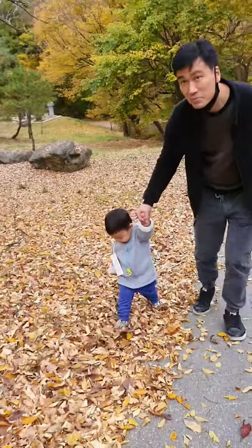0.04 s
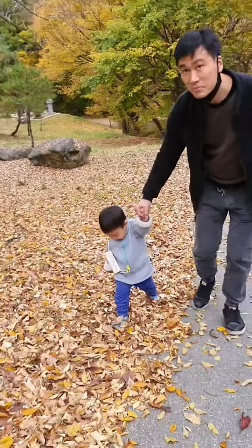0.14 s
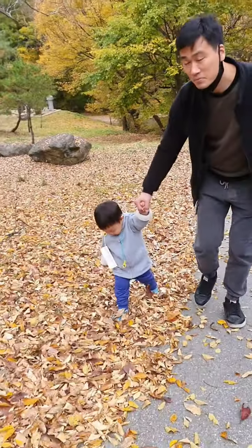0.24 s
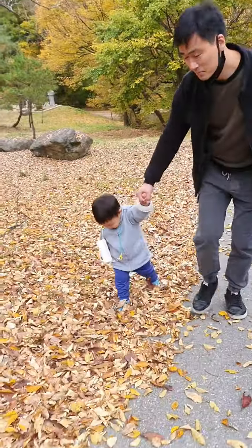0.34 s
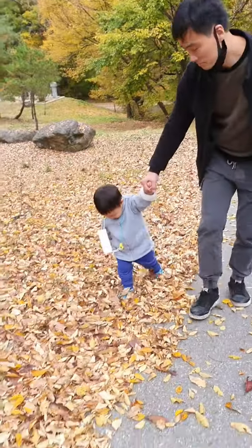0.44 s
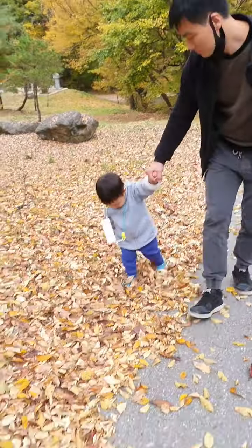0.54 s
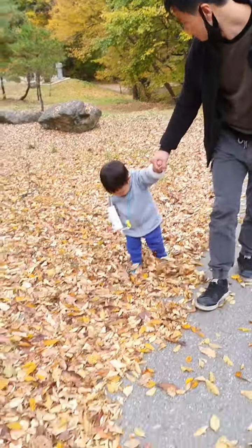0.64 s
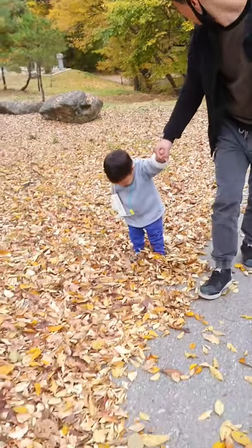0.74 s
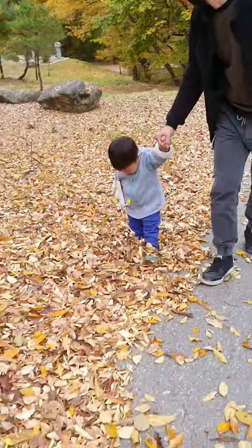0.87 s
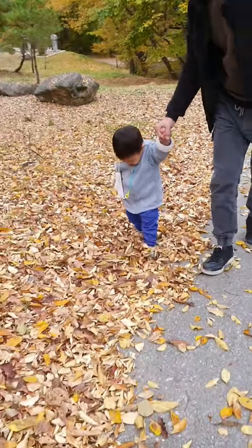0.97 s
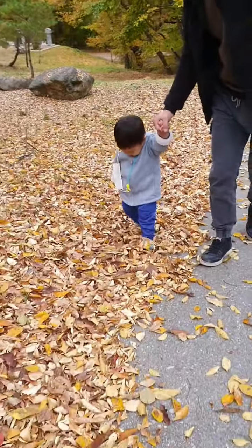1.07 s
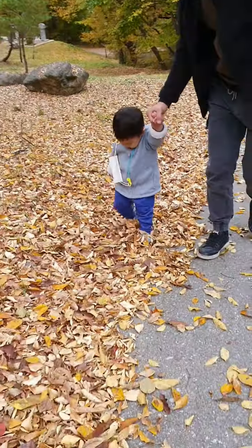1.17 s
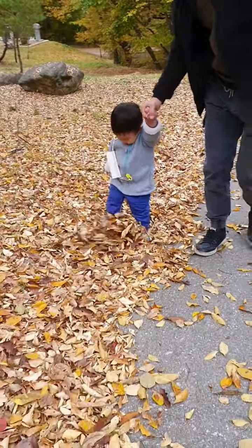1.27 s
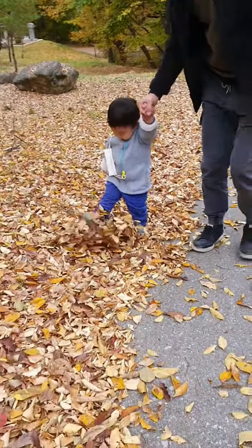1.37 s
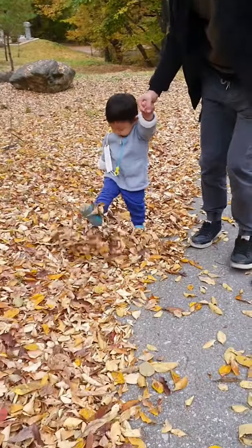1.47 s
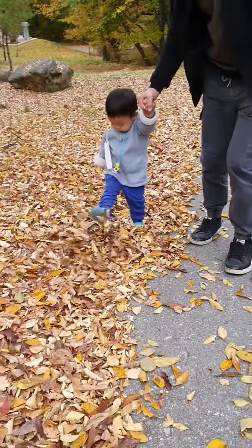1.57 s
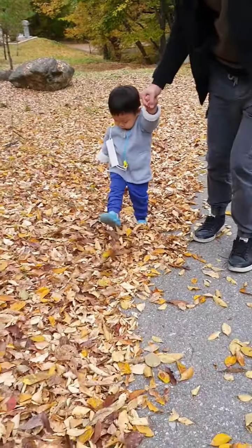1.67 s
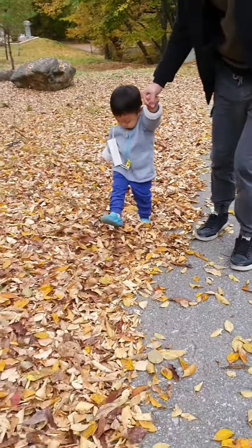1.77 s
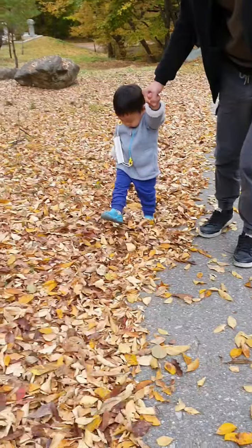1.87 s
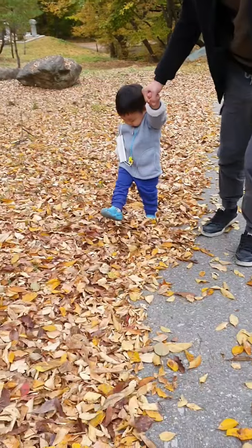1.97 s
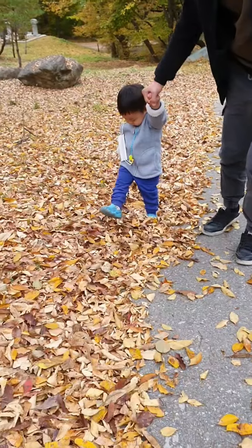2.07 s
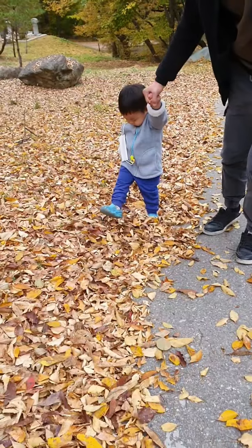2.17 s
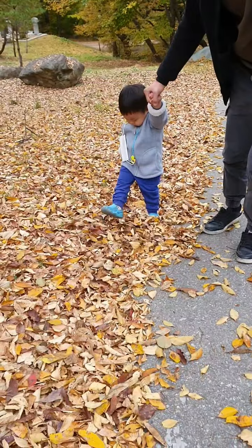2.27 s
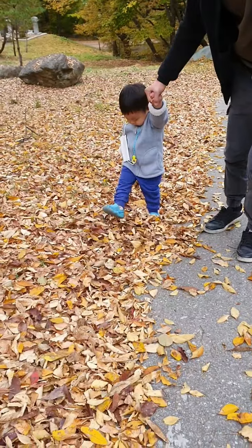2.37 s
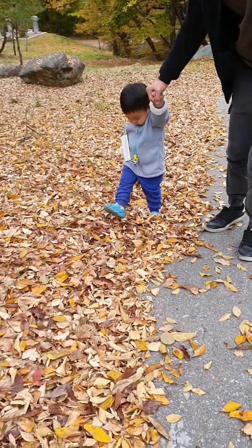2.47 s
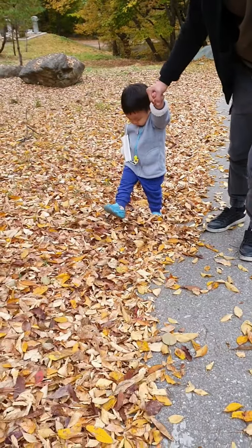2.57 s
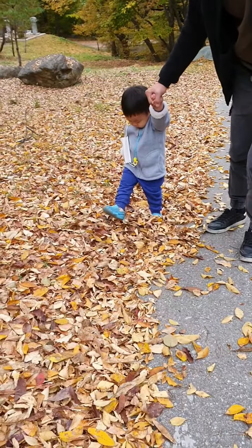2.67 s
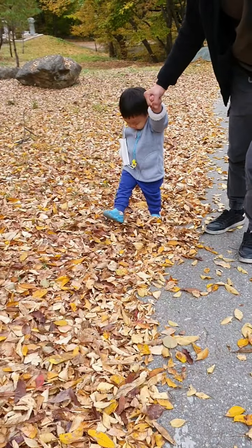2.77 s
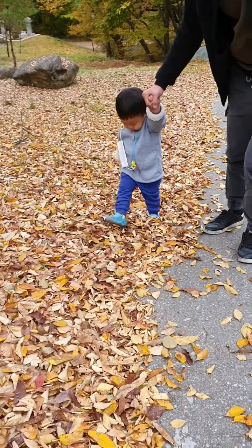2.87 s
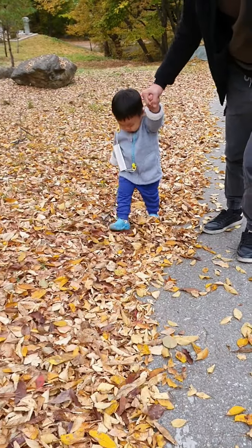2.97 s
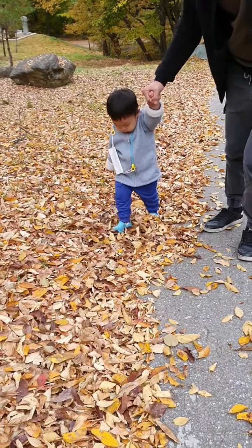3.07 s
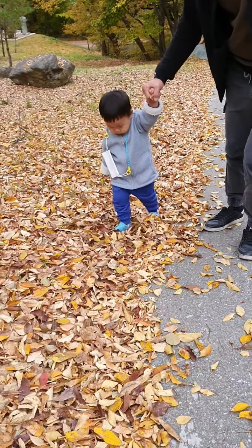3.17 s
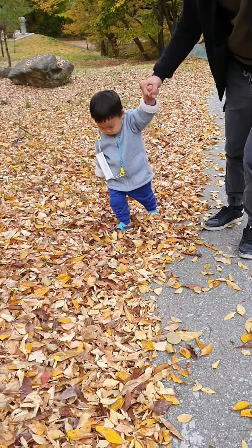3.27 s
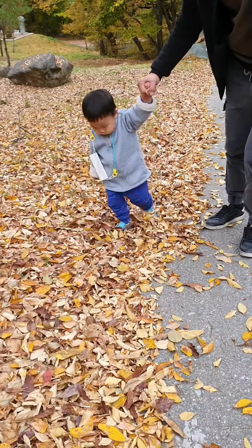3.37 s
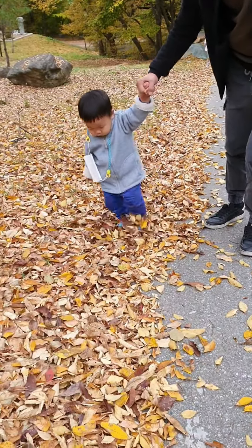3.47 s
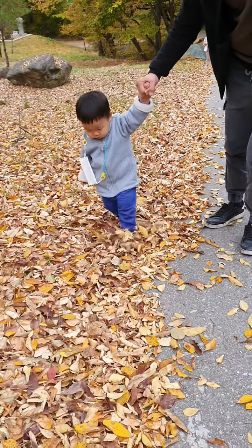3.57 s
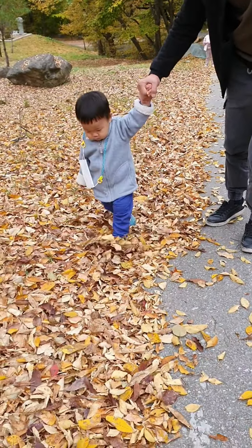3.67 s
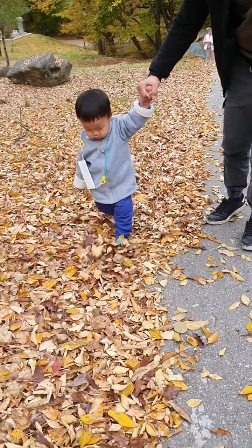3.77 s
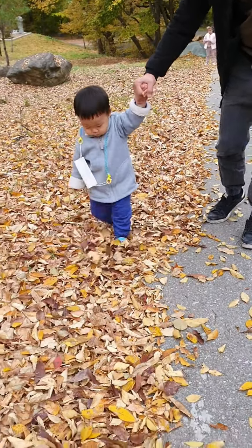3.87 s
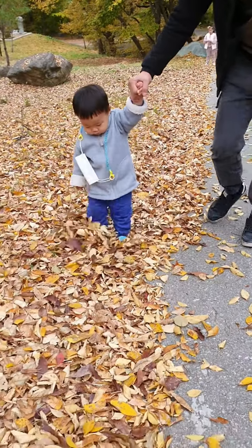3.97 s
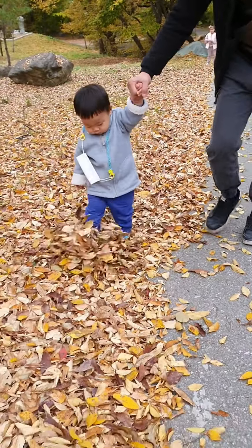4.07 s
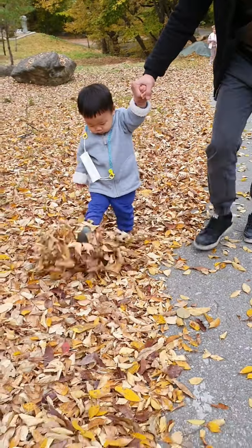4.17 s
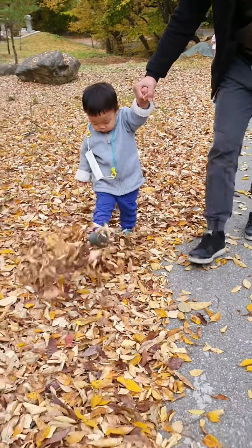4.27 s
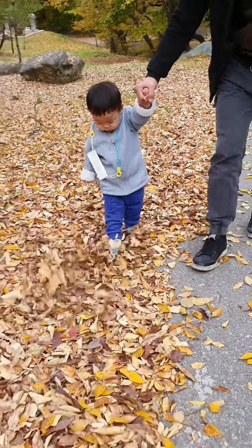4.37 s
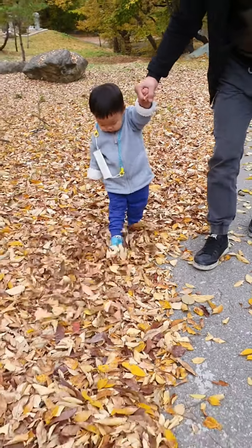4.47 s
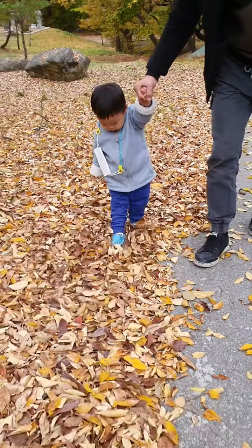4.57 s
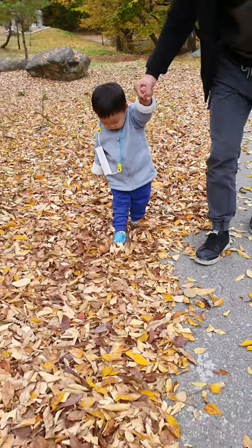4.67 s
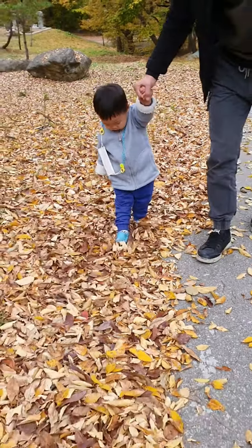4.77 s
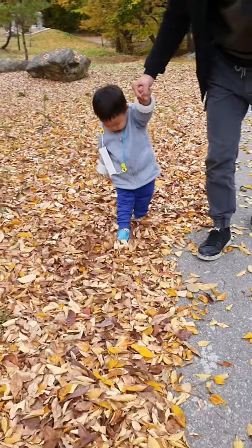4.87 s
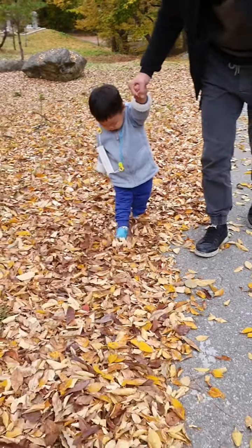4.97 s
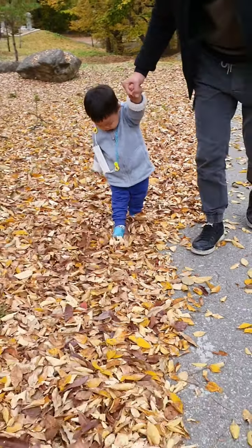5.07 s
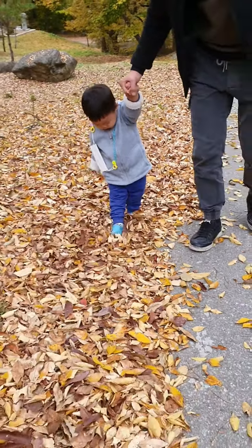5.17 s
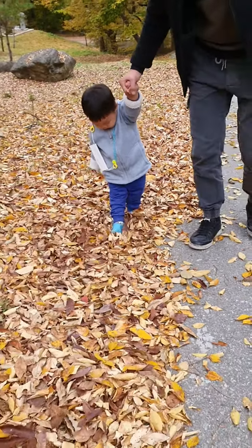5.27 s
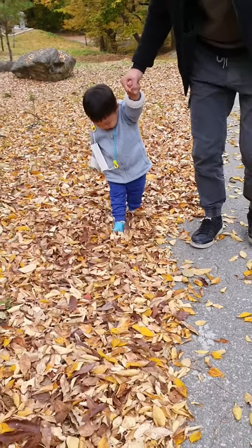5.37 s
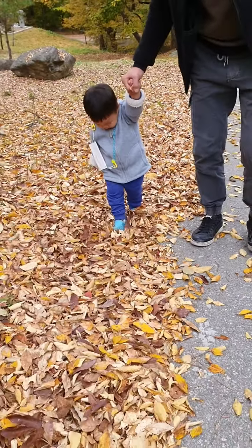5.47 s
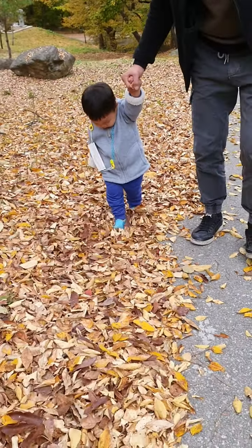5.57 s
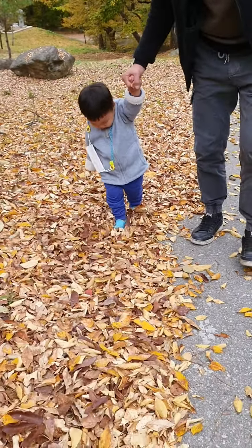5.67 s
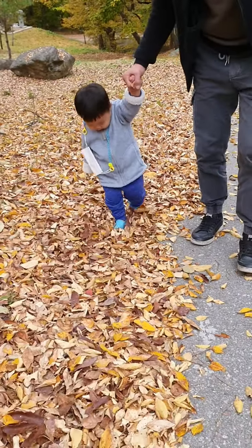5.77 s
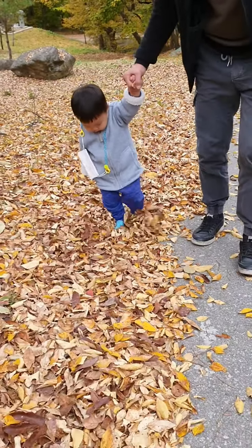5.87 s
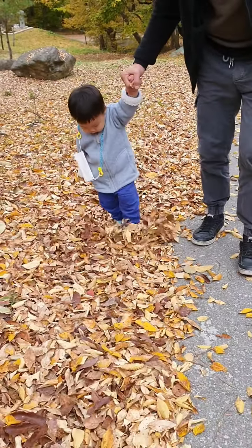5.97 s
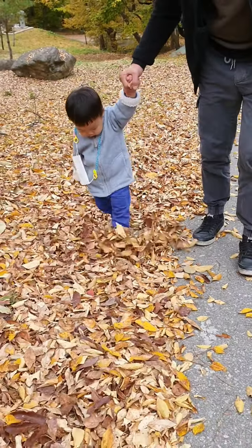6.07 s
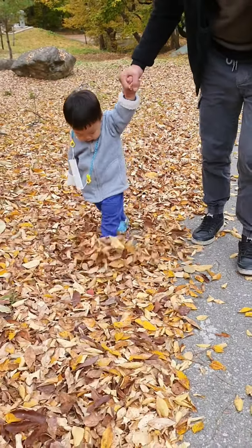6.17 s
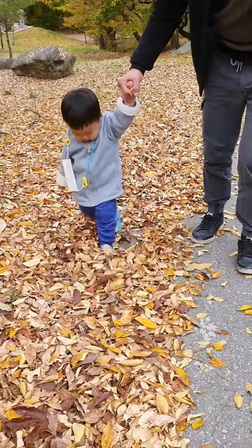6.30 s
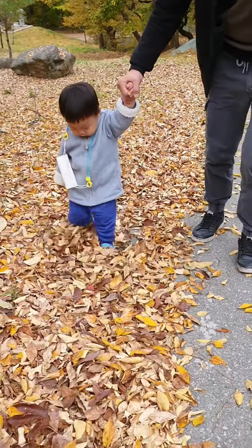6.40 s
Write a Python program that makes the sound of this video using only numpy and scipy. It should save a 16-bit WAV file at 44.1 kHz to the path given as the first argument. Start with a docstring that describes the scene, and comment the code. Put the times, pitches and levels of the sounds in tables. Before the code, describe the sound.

Crisp fallen leaves rustle under shuffling little steps outdoors, stopping briefly, surging into a big kick, then fading to gritty scuffs before rustling again.

```python
"""Swishing dry leaves, with sharp snaps, gritty scuffs, dull thuds and three quick hard clacks.
A toddler shuffles and kicks through a deep bed of leaves, led by an adult on the gritty path beside it.
Thousands of tiny ringing contacts merge into the swishes; stems crack, and soles scrape in noisy bursts.
Feet land as short low tones with a puff, and the clacks ring at a few fixed pitches.
Open park air and a low breeze on the microphones, both filtered noise, lie faintly behind."""
import sys
import numpy as np
from scipy import signal
from scipy.fft import rfft, irfft, next_fast_len
from scipy.io import wavfile
from scipy.ndimage import map_coordinates

SR = 44100
rng = np.random.default_rng(int(sys.argv[2]) if len(sys.argv) > 2 else 0)


def master_out(mix):
    """Clip the mix to full scale and print it as 16-bit PCM to the path in sys.argv[1]."""
    frames = np.transpose(np.atleast_2d(mix))
    ceiling = np.clip(frames, -1, 1)
    pcm = np.round(ceiling * 32767).astype(np.int16)
    wavfile.write(sys.argv[1], SR, pcm)


N = 284004  # length [samples]
TOP_HZ = 15900  # nothing sounds above this

# colour of dry leaves: (frequency [Hz], relative level per Hz [dB])
LEAF_COLOUR = [(60, -43), (100, -22), (280, -15.5), (480, -11.5), (630, -6), (800, -11.5), (1000, -8.5),
               (1140, -11), (1350, -8.5), (2400, -9), (3000, -9.5), (3700, -5.5), (7500, -8.5),
               (15800, -11.5)]
# colour of grit and of small ticking leaves: (frequency [Hz], relative level per Hz [dB])
GRIT_COLOUR = [(500, -35), (1200, -11), (2100, 2), (3000, -5.5), (4000, 0.5), (8000, -2.5), (15800, -4)]


def leaves():
    """Harder pushes set more leaves sliding; brittle ones crack above the swish."""
    ordinary_db = -35  # level of an ordinary stroke
    edge_db, pile_db = 0.02, 1.28  # crisp edges and shoved pile, against the middle of the rustle
    upper_ratio, upper_octaves = 1.32, .16  # smaller leaves ring above the hollow note: pitch ratio, width
    level_db, crisp_db, weight_db, hollow_hz, octaves = footwork()

    push = amp(np.clip(level_db - ordinary_db, -30, 4))
    swish = crackle(6000 + 9000 * push, spread_db=-0.26, ring_s=0.00026, scatter_s=.00007, side_db=4.5)
    cracks = crackle(80 + 500 * push, spread_db=0.5, ring_s=0.00017, scatter_s=.0003, side_db=4.0)

    # leaves come in clumps, so the strength wavers quickly
    clumps = amp(0.62 * wobble(60) + 0.13 * wobble(180))
    reflected = glints(out_of_step(swish), db=-16.5)
    heap = patches(reflected, depth_db=3.5, width_hz=200, life_s=.024)
    heap = unit(patches(heap, depth_db=0.47, width_hz=630, life_s=0.21))
    rustle = coloured(clumps * (heap + amp(-14.5) * cracks), LEAF_COLOUR)
    rustle = hollow(rustle, hollow_hz, octaves, boost_db=10.5)
    rustle = unit(hollow(rustle, upper_ratio * hollow_hz, upper_octaves, boost_db=5.5))

    # the shoved pile sounds low, the curled leaf edges high
    body = filtered(rustle, lambda hz: 1 / (1 + (hz / 1100) ** 4))
    crisp = filtered(rustle, lambda hz: 1 - 1 / (1 + (hz / 7000) ** 4))
    middle = rustle - body - crisp
    edges = amp(crisp_db + edge_db) * crisp
    pile = amp(weight_db + pile_db) * body
    return amp(level_db) * (middle + edges + pile)


def footwork():
    """Each stroke swells, fades and leaves the pile sliding; the loudest strokes set the colour."""
    # pushes of a foot through the leaves: (time of hardest push [s], level [dB], rise [s], fall [s],
    # crispness [dB], weight of the shoved pile [dB], hollow note [Hz], width of that note [octaves])
    strokes = [(.008, -41.5, 0.052, .06, 1, 5.5, 2217, 0.35), (.12, -30.5, .05, .054, 0.5, 1.5, 1989, 0.34),
               (.33, -51, 0.12, .16, 1, 5.5, 1950, 0.26), (.662, -32.5, .105, .1, -2, -1, 1938, 0.24),
               (.845, -35, .098, .042, 5.5, 0.5, 1871, 0.34), (.94, -36, .05, .08, 4.5, -2.5, 1800, .3),
               (1.055, -35.5, 0.079, .045, 3.5, 0.5, 1930, 0.38), (1.189, -48, 0.059, .06, 0, 9, 2012, .25),
               (1.355, -30, 0.076, .105, 1, 4, 2050, 0.29), (1.641, -33.5, .025, .047, 3, 2.5, 2114, 0.18),
               (1.72, -44, .2, .2, 3, 5, 1950, 0.29), (2.16, -53.5, .2, .2, -4, 7.5, 1960, 0.24),
               (2.463, -51.5, .13, .04, 1.5, 0.5, 2020, .28), (2.7, -62, 0.097, .1, 6.5, 11, 1998, 0.24),
               (2.846, -57, .025, 0.026, -2, -17, 1960, 0.3),
               (3.161, -31.5, .074, .082, -.5, 3.5, 1890, 0.15),
               (3.295, -39.5, .1, .075, 0.5, -9, 1931, 0.26), (3.52, -39, .035, .05, 6.5, 3, 1890, 0.27),
               (3.605, -32.5, .07, .125, 2.5, 0, 1904, 0.2), (3.72, -29.5, .119, .088, 0, 0.5, 1900, 0.19),
               (4.065, -27, 0.13, .086, 1, 3, 1971, 0.33), (4.16, -30, 0.082, .13, 1, 0.5, 1960, 0.2),
               (4.424, -32, .07, .07, 1.5, 4, 2022, 0.31), (4.505, -25, .04, .04, 2.5, 2, 1960, 0.28),
               (4.6, -41, 0.03997, .055, 7, 2, 1980, 0.24), (5.08, -60, 0.18, 0.201, 3.5, -1, 1970, 0.27),
               (5.35, -50, .09, .09, 0.5, 2.5, 2030, 0.3), (5.46, -43, .025, .11, 1, 1, 2080, 0.18),
               (5.58, -49, .027, .06, 9, -1, 1980, 0.33), (5.705, -42, .03, .08, 3.5, -6.5, 2010, 0.37),
               (5.822, -38, .052, .031, 2.5, -1, 2046, 0.3),
               (5.955, -32.5, .069, .134, -1.5, 0, 1960, 0.24),
               (6.078, -28.5, .11, .098, 2, 0.5, 2062, 0.24), (6.196, -33, .078, .11, 4, 3, 2024, 0.22),
               (6.31, -36, .052, .17, 0.5, 1, 2039, 0.22)]
    swell_power = 1.25  # shape of a stroke: 1 is pointed, 2 is a bell
    after_db, after_db_per_s = -11.5, 66  # stirred leaves slide on after the foot: level, rate of fading
    rise_limit = 3.2  # a stroke begins this many rise times before its hardest push
    peak_s, db, rise_s, fall_s, *colours = np.transpose(strokes)

    t = np.arange(0, N, 64) / SR  # one value every 64 samples is enough
    since = t - peak_s[:, None]
    rising = since < 0
    away = np.abs(since / np.where(rising, rise_s[:, None], fall_s[:, None]))
    onset = np.where(rising, np.clip(rise_limit - away, 0, 1), 1)
    stroke = np.exp(-away ** swell_power) * onset
    sliding = (since > 0) * amp(after_db - after_db_per_s * np.abs(since))
    power = (amp(db)[:, None] * np.maximum(stroke, sliding)) ** 2 + 1e-20

    total = power.sum(axis=0)
    mixed_colours = np.array(colours) @ power / total
    controls = [10 * np.log10(total), *mixed_colours]
    return [np.interp(np.arange(N) / SR, t, c) for c in controls]


def crackle(rate, spread_db, ring_s, scatter_s, side_db, size=64):
    """Stereo grains of even mean power: each contact rings briefly at its own pitch, rate a second."""
    at = np.flatnonzero(rng.random(N) < rate / SR)
    pitch, phase, strength, life = rng.random((4, len(at)))
    lag, side = rng.standard_normal((2, len(at)))
    t = np.arange(size) / SR
    # a positive spread gives many faint contacts and few strong ones, a negative one few faint ones
    gain = amp(-spread_db * np.log(strength + 0.032)) / np.sqrt(rate[at])
    decay = np.exp(-t / (ring_s * (life[:, None] + 0.3)))
    tone = np.cos(2 * np.pi * (TOP_HZ * pitch[:, None] * t + phase[:, None]))
    grains = gain[:, None] * decay * tone
    # each contact differs in time and level between the microphones
    shift = np.round(lag * scatter_s * SR / 2).astype(int)
    ears = []
    for sign in (1, -1):
        start = np.abs(at + sign * shift)
        heard = grains * amp(sign * side * side_db / 2)[:, None]
        places = start[:, None] + np.arange(size)
        ears.append(np.bincount(places.ravel(), heard.ravel(), N)[:N])
    return unit(np.array(ears))


def out_of_step(x):
    """The rustle reaches the two microphones out of step, by about a full turn across 1 kHz."""
    # how far the left leads: (frequency [Hz], phase lead [radians])
    lead = [(500, 0), (950, 0.77), (1380, 6), (2400, 7.5), (3500, 6.5)]
    half_each = np.array([[.5j], [-.5j]])
    return filtered(x, lambda hz: np.exp(half_each * np.interp(hz, *np.transpose(lead))))


def glints(x, db, count=8):
    """Weak reflections from nearby legs comb the treble, differently in each ear; the bass bends round them."""
    delays = rng.uniform(.001, .018, (2, count))  # [s]
    pulse = np.zeros((2, SR // 40))
    pulse[[[0], [1]], (delays * SR).astype(int)] = amp(db) * rng.choice([-1, 1], (2, count))
    reflections = signal.fftconvolve(x, pulse, axes=1)[:, :N]
    return x + filtered(reflections, lambda hz: 1 - 1 / (1 + (hz / 1800) ** 2))


def patches(x, depth_db, width_hz, life_s, size=512, knee_hz=1500):
    """Every heap of leaves has its own colour: random patches of gain, deepest at short wavelengths."""
    hz, s, z = signal.stft(x, SR, nperseg=size)
    where = np.meshgrid(hz / width_hz, s / life_s, indexing="ij")
    knots = rng.standard_normal((256, 512))
    field = map_coordinates(knots, where, mode="mirror") * (hz / (hz + knee_hz))[:, None]
    return signal.istft(z * amp(depth_db * field), SR, nperseg=size)[1][:, :N]


def hollow(x, centre_hz, octaves, boost_db, size=512):
    """The broad resonance of curled leaves; its centre and width may move."""
    hz, s, z = signal.stft(x, SR, nperseg=size)
    times = np.arange(N) / SR
    centre = np.interp(s, times, np.broadcast_to(centre_hz, N))
    width = np.interp(s, times, np.broadcast_to(octaves, N))
    away = np.log2((hz[:, None] + 1) / centre) / width
    return signal.istft(z * amp(boost_db * np.exp(-away ** 2)), SR, nperseg=size)[1][:, :N]


def snaps(lag_s=.0002):
    """A stem breaks with one sharp crack, and the leaf around it shivers."""
    # stems and leaf ribs snapping: (time [s], relative level [dB], left minus right [dB])
    breaks = [(.441, -32, -7), (.662, -7.5, 4), (.973, -18, -7), (1.0108, -20, -1), (1.017, -18, -12),
              (1.024, -9.5, 1), (1.1853, -13.5, 3), (1.983, -30, -15), (2.058, -30, -13),
              (2.22, -30.5, -17), (2.298, -29, -10), (2.482, -28, -7), (2.843, -37, -3), (3.363, -22, 5),
              (3.392, -19, 5), (3.889, -28, 0), (4.415, -18, -6), (4.479, -16, 7), (4.919, -37, -9),
              (5.309, -36, -8), (5.7, -25, 4), (5.711, -30, 3), (5.913, -14, -11)]
    out, t = np.zeros((2, N)), np.arange(SR // 20) / SR
    for s, db, pan_db in breaks:
        shiver = amp(-23) * amp(-60 * t / 0.03) + amp(-20.5) * amp(-60 * t / 0.029)
        force = shiver * rng.standard_normal((2, len(t)))
        # the crack itself is one click, a little later on the right
        force[0, 0] += 1
        force[1, round(lag_s * SR)] += 1
        crack = coloured(force, LEAF_COLOUR)
        add(out, s, amp(db - 6.0) * panned(pan_db) * crack / np.abs(crack).max())
    return hollow(out, centre_hz=1980, octaves=0.24, boost_db=10)


def scuffs():
    """Grit grinds under a sole in short, bright, sputtering bursts."""
    # soles on grit and stray leaves: (time [s], relative level [dB], left minus right [dB],
    # length [s], relative leaf crinkle [dB], sparkle gain [dB])
    scrapes = [(2.483, -36, -9, 0.0056, 2, 14), (2.497, -30, -5, 0.014, 4, 3.5), (2.64, -37, -1, .01, 1, 3),
               (2.665, -46, 0, .01, -5, 0), (2.7, -46, 0, 0.01, -8, -1), (2.704, -39, -6, 0.0092, -11, 9),
               (4.821, -35.5, -9, 0.028, -2, 6), (4.834, -37.5, -2, 0.017, 10, 5),
               (4.856, -43, -7, 0.026, -4, -2), (5.274, -39.5, -9, 0.0091, 12, 5),
               (5.307, -43, -17, 0.0077, 17, 20), (5.42, -31.5, -2, 0.034, -17, 4),
               (5.437, -28.5, 3, 0.033, -23, 7), (5.488, -29, -3, 0.021, 5, -3),
               (5.534, -32.5, 0, 0.021, 6, -2), (5.571, -24.5, -2, 0.0088, -16, 13),
               (5.6, -37.5, 0, 0.05, 2, 3), (5.672, -30.5, -7, 0.01, -9, 16),
               (5.694, -27.5, -8, 0.024, -4, 8.5), (5.696, -34, -6, 0.0073, -10, 12),
               (5.707, -32, -5, 0.009, -3, 15)]
    out, t = np.zeros((2, N)), np.arange(SR // 6) / SR
    grit = crackle(np.full(N, 8000), spread_db=1.0, ring_s=0.0005, scatter_s=0.00044, side_db=3.5)
    sputter = grit * amp(1.1 * wobble(300))
    grit = patches(sputter, depth_db=2.5, width_hz=970, life_s=.007)
    grit = unit(coloured(grit, GRIT_COLOUR))
    crinkle = unit(filtered(grit, lambda hz: np.exp(-((hz - 2150) / 350) ** 2)))
    sparkle = filtered(grit, lambda hz: 1 - 1 / (1 + (hz / 11500) ** 6))
    for s, db, pan_db, length, crinkle_db, sparkle_db in scrapes:
        now = slice(round(s * SR), round(s * SR) + len(t))
        sound = grit[:, now] + (amp(sparkle_db) - 1) * sparkle[:, now]
        sound = sound + amp(crinkle_db - 10) * crinkle[:, now]
        pressure = (1 - np.exp(-t / 0.0043)) * np.exp(-2 * t / length)
        add(out, s, amp(db - 5.5) * panned(pan_db) * pressure * sound)
    return out


def clacks(lag_s=.00045):
    """Something hard is knocked three times in quick succession, mostly to the right, and rings."""
    # the knocks: (time [s], relative level [dB], left minus right [dB])
    knocks = [(1.842, -19, 2), (1.848, -17.5, -8), (1.855, -18, -1)]
    # ringing pitches: (frequency [Hz], relative level [dB], time to fall 60 dB [s])
    modes = [(1870, -13, 0.011), (2246, -8, 0.0066), (4400, -1.5, 0.0031), (4840, 1.5, 0.0033),
             (5550, -5, 0.0026)]
    out, t = np.zeros((2, N)), np.arange(SR // 20) / SR
    for s, db, pan_db in knocks:
        ring = np.zeros(len(t))
        for hz, level, t60 in modes:
            # each knock excites the pitches a little differently
            ring += amp(level + rng.normal(0, 2.0) - 60 * t / t60) * np.sin(2 * np.pi * hz * t)
        ring = ring * (1 - np.exp(-t / 0.00032))
        ring = ring / np.abs(ring).max()
        # the knock is trailed by a weak rattle, and reaches the right first
        contact = amp(-22.5) * amp(-60 * t / 0.035) * rng.standard_normal((2, len(t)))
        contact[0, round(lag_s * SR)] += 1
        contact[1, 0] += 1
        knock = signal.fftconvolve(contact, ring[None], axes=1)
        add(out, s, amp(db + 1.5) * panned(pan_db) * knock)
    return out


def thuds():
    """Weight lands on soft ground, or twigs knock under it: a few dull cycles and a low puff."""
    # feet and dull twig knocks: (time [s], relative level [dB], pitch [Hz], time to fall 60 dB [s])
    landings = [(.441, -31.5, 610, 0.0063), (0.471, -45, 54.9, 0.096), (0.776, -46, 49.85, 0.079),
                (.885, -35, 100.9, 0.082), (.935, -41, 55.05, 0.11), (1.635, -25, 364.2, 0.048),
                (1.66, -33.5, 216, 0.068), (1.673, -33.5, 90.1, 0.046), (1.955, -40, 111, 0.11),
                (2.105, -55, 249.3, .04), (2.25, -50, 221, 0.053), (3.2, -42, 64.6, 0.091),
                (4.412, -32, 184, 0.073), (4.451, -26.5, 161, 0.038), (4.489, -31.5, 397, 0.056),
                (4.919, -34.5, 446.5, 0.006), (5.25, -48, 60.1, 0.071), (5.875, -54, 55, 0.083),
                (6.255, -48, 51, 0.11)]
    out, t = np.zeros((2, N)), np.arange(SR // 4) / SR
    for s, db, hz, t60 in landings:
        noise = rng.standard_normal(len(t))
        puff = unit(filtered(noise, lambda f: f / (f + 120) / (1 + (f / 330) ** 3)))
        shape = amp(-60 * t / t60) * (1 - np.exp(-20 * t / t60)) ** 2
        thud = shape * (np.cos(2 * np.pi * hz * t) + 0.49 * puff)
        add(out, s, amp(db) * panned(-0.4) * thud)
    return out


def settling():
    """Crushed leaves spring back with faint single ticks, all the way through."""
    ticks = crackle(np.full(N, 90), spread_db=.7, ring_s=0.000083, scatter_s=0.00053, side_db=6)
    return amp(-78) * unit(coloured(ticks, GRIT_COLOUR))


def air():
    """Faint park hush and a light, gusty breeze on the microphones, both partly shared noise."""
    # park hush: (frequency [Hz], relative level per Hz [dB])
    hush_colour = [(12, -7), (20, 2), (53, -5.5), (110, 5), (187, -4.5), (600, -4.5), (970, -7.5),
                   (1950, -9), (3200, -16), (6400, -25), (7400, -6), (8200, -11), (9300, -31.5),
                   (15800, -21)]
    # breeze on the microphones: (frequency [Hz], relative level per Hz [dB])
    rumble_colour = [(15, -14), (50, 14), (110, 0), (200, -21), (500, -45), (2000, -63)]
    # the breeze before its gusts: (time [s], level [dB])
    breeze = [(0, -60), (.3, -71), (.8, -58), (1.1, -68), (1.95, -59.5), (2.5, -71), (2.72, -59),
              (2.92, -75), (3.4, -60), (3.7, -70), (4.3, -63.5), (4.7, -73), (5.3, -65.5), (5.88, -58.5),
              (6.05, -74), (6.28, -57), (6.44, -71)]
    hush_db = -60
    gust_db, gusts_per_s = 1, 11  # swing and pace of the gusts
    breeze_db = np.interp(np.arange(N) / SR, *np.transpose(breeze))
    # noise of its own in each channel, plus some noise common to both
    hush = rng.standard_normal((2, N)) + 0.8 * rng.standard_normal(N)
    hush = unit(coloured(hush, hush_colour))
    rumble = rng.standard_normal((2, N)) + 0.59 * rng.standard_normal(N)
    rumble = unit(coloured(rumble, rumble_colour))
    return amp(hush_db) * hush + amp(breeze_db + gust_db * wobble(gusts_per_s)) * rumble


def amp(db):
    """Decibels to gain."""
    return 10 ** (np.asarray(db) / 20)


def unit(x):
    """Scale to rms 1."""
    return x / np.sqrt(np.mean(x ** 2) + 1e-20)


def along(points, hz):
    """Read (Hz, value) points on a log axis."""
    f, v = np.transpose(points)
    return np.interp(np.log(hz + 1), np.log(f + 1), v)


def wobble(rate):
    """A smooth random curve, rate knots a second."""
    knots = rng.standard_normal(int(N * rate / SR) + 4)
    return map_coordinates(knots, [np.arange(N) * rate / SR])


def filtered(x, response):
    """Multiply the spectrum of x by a response of frequency."""
    n = x.shape[-1]
    m = next_fast_len(n + 8192)  # spare room for the filter's tail
    return irfft(rfft(x, m) * response(np.fft.rfftfreq(m, 1 / SR)), m)[..., :n]


def coloured(x, spectrum, size=2048):
    """Causal filter of unit energy with the given (Hz, dB) shape."""
    # folding the cepstrum (spectrum of the log spectrum) puts the whole pulse after time zero
    cepstrum = irfft(np.log(amp(along(spectrum, np.fft.rfftfreq(size, 1 / SR)))))
    cepstrum[1:size // 2] *= 2
    cepstrum[size // 2 + 1:] = 0
    pulse = irfft(np.exp(rfft(cepstrum)))
    return signal.fftconvolve(x, pulse[None] / np.linalg.norm(pulse), axes=1)[:, :x.shape[1]]


def panned(db):
    """Left and right gains for a level difference."""
    return amp(np.array([[.5], [-.5]]) * db)


def add(track, s, sound):
    """Mix a stereo sound in at time s."""
    part = track[:, max(round(s * SR), 0):][:, :sound.shape[1]]
    part += sound[:, :part.shape[1]]


def scene():
    """All the sources sound together in the open, with no room echo."""
    return leaves() + settling() + snaps() + scuffs() + clacks() + thuds() + air()


def record(dry):
    """The two microphones differ a little in colour; nothing passes above the band limit."""
    # the microphones disagree most around 1 to 1.4 kHz: (frequency [Hz], gain of their difference [dB])
    width = [(750, -0.5), (1000, 2), (1150, 0), (1400, 5), (2000, 0), (4000, 0), (8000, 0)]
    # colour difference of the microphones: (frequency [Hz], left minus right [dB])
    tilt = [(200, -2.5), (700, -.5), (1290, -1), (2380, -2.5), (4400, 2), (8100, 0), (15000, 1)]
    mid = dry.mean(axis=0)
    pair = mid + filtered(dry - mid, lambda hz: amp(along(width, hz)))
    return filtered(pair, lambda hz: panned(along(tilt, hz)) * (hz < TOP_HZ))


dry = scene()
out = record(dry)
master_out(out)
```